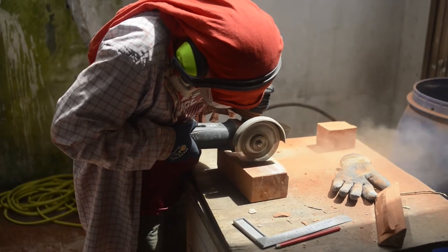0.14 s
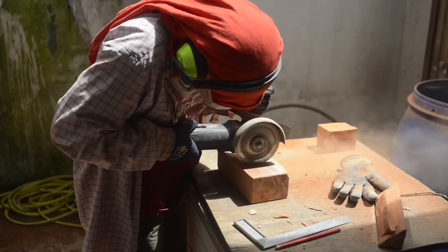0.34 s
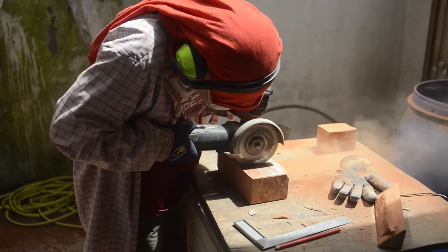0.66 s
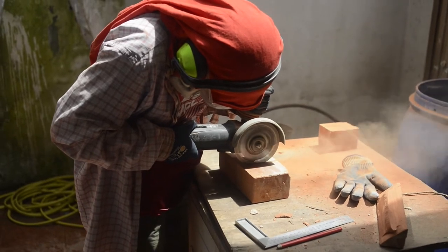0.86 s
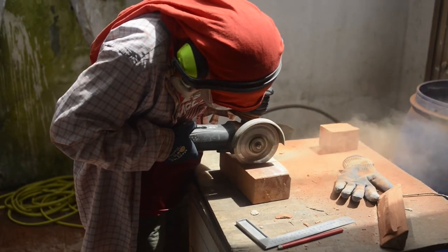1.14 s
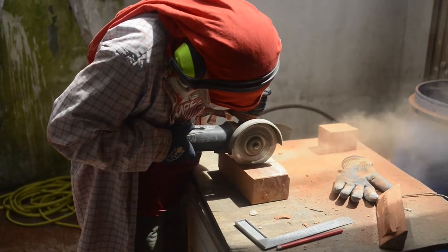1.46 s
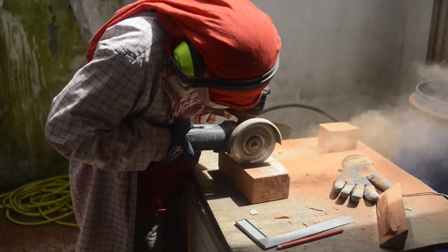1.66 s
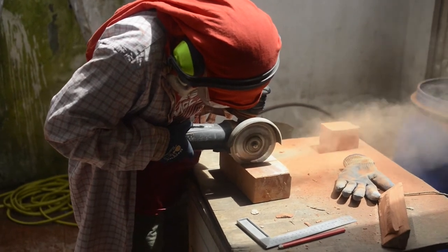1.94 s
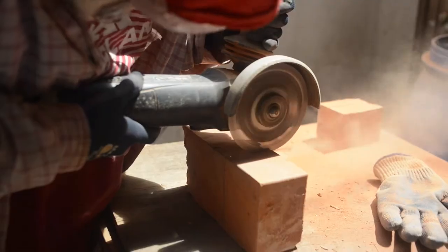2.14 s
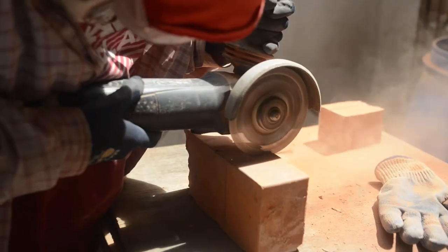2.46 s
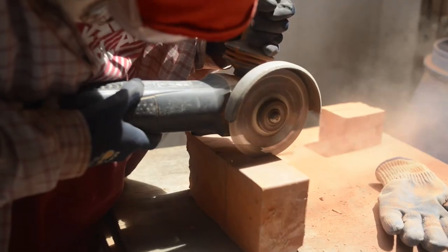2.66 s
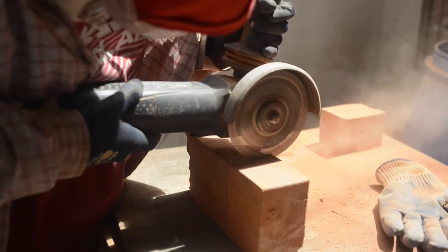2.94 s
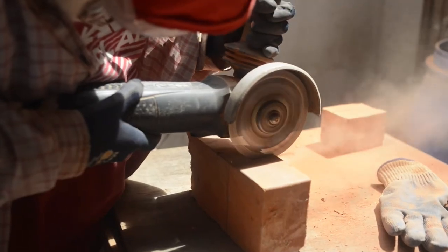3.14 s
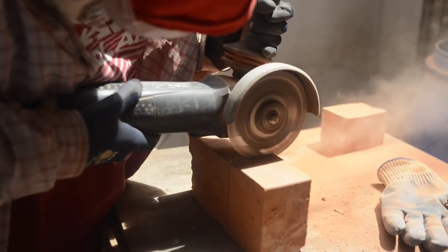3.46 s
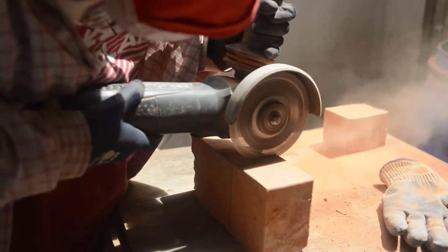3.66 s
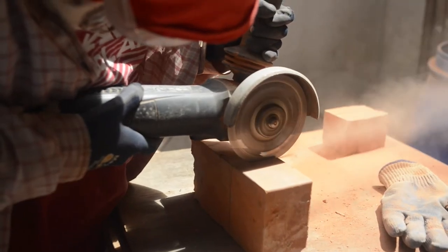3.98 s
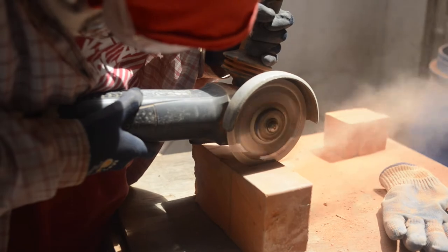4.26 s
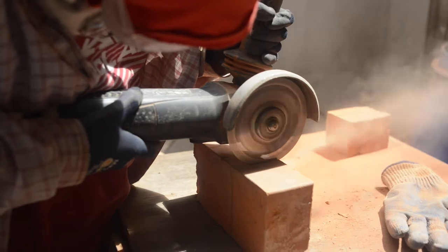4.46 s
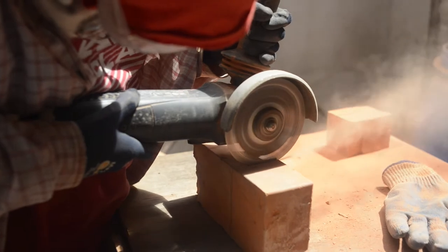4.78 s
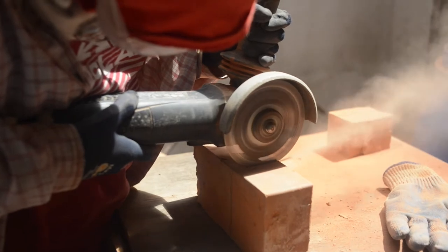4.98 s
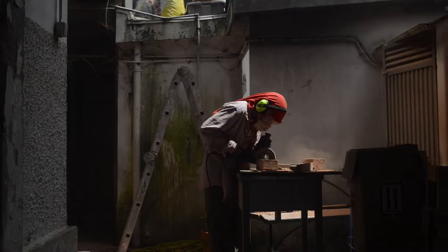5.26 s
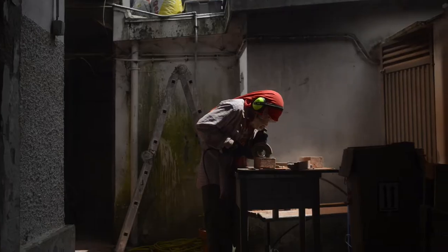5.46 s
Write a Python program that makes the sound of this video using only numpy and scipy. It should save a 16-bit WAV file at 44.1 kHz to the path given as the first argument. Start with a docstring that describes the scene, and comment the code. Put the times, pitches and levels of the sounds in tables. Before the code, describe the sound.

An angle grinder cuts brick with a steady hissing, ringing metallic scrape, changing tone as the listening point moves close, then far away.

```python
"""A hissing, ringing scrape throbs from the start: an angle grinder cuts a brick on a bench in a walled yard.
It is heard from the side, then close to the disc, then from afar; both channels carry the same signal.
Noise driven through narrow resonances rings the steel disc and its guard; shaped noise is brick grit and fan air.
Tones locked to the spindle whine beneath. Short resonant bursts are cracking chips and low knocks;
near the end the gear whine swells four times."""
import sys
import numpy as np
from scipy import signal
from scipy.fft import rfft, irfft
from scipy.io import wavfile
from scipy.ndimage import uniform_filter1d

SR = 44100
rng = np.random.default_rng(int(sys.argv[2]) if len(sys.argv) > 2 else 0)


def dump(signal):
    """Clip the signal to [-1, 1] and save it as 16-bit WAV at the path in sys.argv[1]."""
    limited = np.clip(np.atleast_2d(signal).T, -1, 1)
    pcm = np.round(limited * 32767).astype(np.int16)
    wavfile.write(sys.argv[1], SR, pcm)


N = 247779
TIME = np.arange(N) / SR  # seconds
FREQ = np.maximum(np.arange(N // 2 + 1) * SR / N, 1)  # Hz, kept above zero for logarithms
MAINS_HZ = 50
TOP_HZ = 15700  # upper edge of the passband
SQUEAL_ORDER = 21  # clean gear whine, as a multiple of the spindle speed

# Moves of the listening place, side to close and close to far: time_s
PLACE_CHANGES = [2.105, 5.145]
# Mean spindle speed: time_s, turns_hz
SPINDLE_SPEED = [(0, 145.1), (1.2, 145.05), (2.1, 145.35), (5.3, 145.33), (5.62, 145.05)]
# How hard the disc is fed into the brick: time_s, cut_level_db
FEED = [(0, -34.5), (2.07, -34), (2.15, -36), (2.5, -33), (2.85, -32), (4.4, -34), (4.65, -32), (5.14, -35),
        (5.24, -41), (5.34, -38.5), (5.62, -39)]
# Hardest bites (+) and skips (-) of the rim: centre_s, change_db, length_s
BITES = [(0.603, 2.5, 0.016), (1.583, 2.5, 0.024), (2.116, -9, 0.017), (2.383, 7, 0.011),
         (5.125, 3.5, 0.019)]
# Resonances of disc and guard, width for each of two filter passes, level relative to each other:
# pitch_hz, width_hz, side_db, close_db, far_db
DISC_MODES = [(2907, 277, -21, -36, -28), (3068, 335, -23, -24, -18), (3359, 445, -13, -22, -24),
              (3452, 106, -16, -21, -10), (3736, 275, -19, -13, -20), (3908, 68, -25, -28, -20),
              (4016, 97, -25, -30, -20), (4479, 120, -15, -15, -7), (4580, 212, -20, -14, -17),
              (5303, 219, -16, -12, -10), (5392, 115, -14, -17, -16), (5852, 143, -17, -18, -12),
              (6119, 121, -11, -27, -9), (6225, 294, -9, -8, -16), (7023, 72, -18, -17, -19),
              (7265, 242, -13, -33, -15), (7506, 378, -31, -15, -21), (7986, 94, -14, -10, -13),
              (8197, 169, -13, -10, -13), (9137, 77, -22, -26, -19), (10659, 335, -22, -24, -29),
              (11301, 297, -18, -23, -21), (12010, 249, -22, -23, -19), (12698, 389, -23, -26, -26),
              (13142, 972, -23, -26, -19), (14027, 203, -29, -30, -26), (14513, 584, -28, -32, -39),
              (15447, 213, -29, -30, -28)]
# Two modes that sing out, level before rubbing:
# pitch_hz, width_hz, side_db, close_db, far_db, grip (dB gained per dB of rubbing)
SINGING_MODES = [(6762, 76, -12.5, -9, -8.5, 1.5), (9443, 82, -6.5, -11, -12, 0.36)]
# How hard the disc rubs the sides of the slot: time_s, change_db
SLOT_RUB = [(0, 2), (1.4, -1), (2.2, 2), (3.2, -2), (3.35, 1.5), (3.9, 3.5), (4.5, 0), (5.0, 3.5),
            (5.3, -1.5)]
# Spectrum of crumbling brick and fan air, relative to the scrape and fan levels:
# pitch_hz, side_db_per_hz, close_db_per_hz, far_db_per_hz
HISS_SPECTRA = [(30, -77, -69, -81), (99, -64.5, -65.5, -68), (220, -62, -60.5, -68),
                (400, -60, -60, -62.5), (1045, -53, -55, -49.5), (1990, -50.5, -47, -47.5),
                (2680, -50, -48, -42.5), (3450, -40, -62, -37.5), (4670, -48.5, -49, -44),
                (7160, -41, -46, -41.5), (8800, -44.5, -50.5, -44.5), (11000, -42, -50.5, -45),
                (12650, -57, -64, -52), (15800, -63, -63, -61)]
# Motor and gear tones, levels relative to each other: spindle_multiple, side_db, close_db, far_db
DRIVE_TONES = [(1.3, -92, -83, -102), (1.7, -77, -82, -101), (4, -74, -74, -73), (5, -71, -74, -87),
               (6, -77, -77, -86), (7, -69, -86, -83), (10.35, -68, -71, -66), (13, -65, -76, -76),
               (14.9, -65, -74, -71), (18, -71, -60, -60), (19, -67, -66, -60), (20, -55, -66, -60),
               (21, -55, -67, -70), (23, -56, -69, -57), (24, -65, -56, -70), (26, -63, -54, -70),
               (31, -68, -55, -70)]
# Chips cracking off the brick, peaks relative to each other: start_s, level_db
CHIPS = [(0.184, -26), (0.8794, -25), (1.0794, -26), (1.3424, -27), (1.496, -26), (1.6377, -25),
         (1.8083, -27), (2.6753, -25), (2.9856, -26), (3.0714, -25)]
# The rim catches and the brick knocks on the bench, peaks relative to each other: start_s, level_db
KNOCKS = [(1.331, -53), (1.575, -52), (2.389, -59), (2.669, -63), (3.06, -64), (3.829, -54), (4.059, -50),
          (4.12, -54), (4.609, -51)]
# Higher gear tones above the clean whine: spindle_multiple, share_db
HIGHER_ORDERS = [(24, -1.5), (26, -5.5), (31, -1)]
# Swells of the gear whine, heard from afar: centre_s, length_s, clean_tone_db, higher_tones_db
SQUEALS = [(5.172, 0.11, -37.5, -52), (5.309, 0.072, -34.5, -50), (5.385, 0.062, -41, -46),
           (5.52, 0.11, -45, -39.5)]


def undb(db):
    """Level and amplitude: 20 dB is a tenfold gain."""
    return 10 ** (np.asarray(db) / 20)


def unit(x):
    """Normalisation: scale a signal to rms 1."""
    return x / np.sqrt(np.mean(x ** 2))


def curve(rows):
    """Linear interpolation: join each table column by straight lines in time."""
    knots_s, *columns = np.transpose(rows)
    return [np.interp(TIME, knots_s, column) for column in columns]


def walk(rate_hz):
    """Slow random modulation: `rate_hz` random values a second, joined by lines, with rms 1."""
    knots = rng.standard_normal(4096)
    return unit(np.interp(TIME * rate_hz, np.arange(len(knots)), knots))


def swell(centre_s, length_s):
    """Gaussian envelope: above half height for `length_s` around its centre."""
    return np.exp(-np.log(2) * (2 * (TIME - centre_s) / length_s) ** 2)


def resonate(x, hz, width_hz):
    """Damped resonance: a second-order peak with gain 1 at its centre."""
    b, a = signal.iirpeak(hz, hz / width_hz, fs=SR)
    return signal.lfilter(b, a, x)


def colour(x, hz, db_per_hz):
    """Spectral shaping: weight white sound of rms 1 by a density interpolated over log frequency."""
    gain = undb(np.interp(np.log(FREQ), np.log(hz), db_per_hz))
    bass_cut = np.minimum(FREQ / hz[0], 1) ** 2
    return irfft(rfft(x) * gain * bass_cut * np.sqrt(SR / 2), N)


def places():
    """Listening position: one row for each place, 1 while it is heard, with short crossfades."""
    place = np.searchsorted(PLACE_CHANGES, TIME)
    is_here = place == np.arange(len(PLACE_CHANGES) + 1)[:, None]
    return uniform_filter1d(1. * is_here, size=64, axis=1)


def throb(turns, wobble, ripple, beat, shake_db):
    """Amplitude modulation: a warped disc touches twice a turn; torque ripples at twice mains and beats."""
    mains = 2 * MAINS_HZ * TIME  # cycles of torque ripple
    regular = wobble * np.cos(4 * np.pi * turns)
    regular += ripple * np.cos(2 * np.pi * mains)
    regular += beat * np.cos(2 * np.pi * (turns - mains))
    return unit((1 + regular) * undb(shake_db * walk(70)))


def bites(per_second=36, spread_db=0.6):
    """Irregular contact: the rim bites and skips all the time, a few times hard; in dB."""
    hard_db = sum(db * swell(centre_s, length_s) for centre_s, db, length_s in BITES)
    return spread_db * walk(per_second) + hard_db


def ring(contact, hz, width_hz, sway_db, saturation):
    """Friction-driven mode: two resonances in series give steep flanks; the level sways with the contact point."""
    rubbed = rng.standard_normal(N) * contact * undb(sway_db * walk(30))
    swing = resonate(resonate(rubbed, hz, width_hz), hz, width_hz)
    # the friction that feeds a mode also limits it, which evens out its swings
    envelope = np.abs(signal.hilbert(swing))
    return unit(swing / envelope ** saturation)


def disc(feed_db, contact, heard, ring_db=0.07):
    """Modal vibration: the scraping rim drives all modes; two sing out as the disc rubs the slot."""
    body, song = 0, 0
    rub_db = curve(SLOT_RUB)[0]
    for hz, width_hz, *share_db in DISC_MODES:
        mode = ring(contact, hz, width_hz, sway_db=0.63, saturation=0.047)
        body = body + mode * (undb(share_db) @ heard)
    for hz, width_hz, *share_db, grip in SINGING_MODES:
        mode = ring(contact, hz, width_hz, sway_db=0.2, saturation=0.11)
        song = song + mode * (undb(share_db) @ heard) * undb(grip * rub_db)
    return (body * undb(ring_db) + song) * undb(feed_db)


def grit(per_second=9000, spread_db=1.5, air=0.81):
    """Impulse noise: dense fractures of unequal size and random sign in a rush of air."""
    hit = rng.random(N) < per_second / SR
    sizes = undb(spread_db * np.minimum(rng.exponential(size=N), 6))
    fractures = unit(hit * sizes * rng.choice([-1, 1], N))
    return unit(fractures + air * rng.standard_normal(N))


def crumbling(feed_db, contact, heard, fan_hz=1500, fan_db=-33.5, fan_drift_db=1.0):
    """Broadband noise: treble grit follows the feed; the bass is mostly the steadier rush of the fan."""
    hz, *spectra = np.transpose(HISS_SPECTRA)
    fan_share = 1 / (1 + (FREQ / fan_hz) ** 4)  # share of power
    scrape = grit() * contact * undb(feed_db)
    # the fan level moves half as many dB as the feed
    fan_level_db = fan_drift_db * walk(15) + (fan_db + feed_db) / 2
    fan = rng.standard_normal(N) * contact * undb(fan_level_db)
    rush = irfft(rfft(scrape) * np.sqrt(1 - fan_share) + rfft(fan) * np.sqrt(fan_share), N)
    return sum(on * colour(rush, hz, db) for on, db in zip(heard, spectra))


def tone(cycles, jitter, flutter_db):
    """Phase and amplitude modulation: play between the teeth makes a machine tone flutter (jitter in rad)."""
    phase = 2 * np.pi * (cycles + rng.random()) + jitter * walk(40)
    return unit(np.sin(phase) * undb(flutter_db * walk(25)))


def drive(turns, heard, tones_db):
    """Rotational orders: motor and gear tones keep fixed ratios to the spindle speed."""
    hum = 0
    for multiple, *level_db in DRIVE_TONES:
        hum = hum + tone(multiple * turns, jitter=0.36, flutter_db=2.0) * (undb(level_db) @ heard)
    return undb(tones_db) * hum


def yard(x, heard, wall_db=-11, decay_s=0.034):
    """Early reflection: bench and walls return echoes, different at each place, which ripple the spectrum."""
    age = np.arange(SR // 6) / SR
    reflected = 0
    for on in heard:
        echoes = rng.standard_normal(len(age)) * np.exp(-age / decay_s) * (age > .003)
        echoes /= np.linalg.norm(echoes)
        reflected = reflected + on * signal.fftconvolve(x, echoes)[:N]
    return (x + undb(wall_db) * reflected) / np.hypot(1, undb(wall_db))


def cracks(events, decay_s, ring_hz, width_hz, gain_db):
    """Impact response: each event is a decaying noise burst through one broad resonance."""
    out = np.zeros(N)
    age = np.arange(SR // 12) / SR
    for start_s, level_db in events:
        burst = rng.standard_normal(len(age)) * np.exp(-age / decay_s)
        crack = resonate(burst, ring_hz, width_hz)
        start = int(start_s * SR)
        out[start:start + len(age)] += crack * undb(level_db + gain_db) / np.abs(crack).max()
    return out


def chips():
    """Brittle fracture: chips crack off the brick as very short bursts."""
    return cracks(CHIPS, decay_s=.0008, ring_hz=3500, width_hz=2000, gain_db=-1)


def knocks():
    """Low-frequency impact: the rim catches and the brick knocks on the bench."""
    return cracks(KNOCKS, decay_s=.012, ring_hz=200, width_hz=220, gain_db=-1.5)


def squeal(turns):
    """Gear-mesh orders: as the tool tilts, one clean tone and a higher group above it swell."""
    clean_gain = sum(undb(db) * swell(s, length_s) for s, length_s, db, _ in SQUEALS)
    high_gain = sum(undb(db) * swell(s, length_s) for s, length_s, _, db in SQUEALS)
    clean = tone(SQUEAL_ORDER * turns, jitter=.2, flutter_db=2.0)
    high = sum(undb(db) * tone(multiple * turns, jitter=0.25, flutter_db=1.0) for multiple, db in HIGHER_ORDERS)
    return clean_gain * clean + high_gain * high


def scene():
    """Superposition: one spindle drives the tones, one feed and contact the cut; echoes join all but the gears."""
    speed_hz = curve(SPINDLE_SPEED)[0] * (1 + 0.00046 * walk(12))
    turns = np.cumsum(speed_hz) / SR
    feed_db, heard = curve(FEED)[0], places()
    contact = throb(turns, wobble=0.067, ripple=0.14, beat=.14, shake_db=0.68) * undb(bites())
    cut = disc(feed_db, contact, heard) + crumbling(feed_db, contact, heard)
    gears = drive(turns, heard, tones_db=-0.2) + squeal(turns) * heard[-1]
    sound = yard(cut + chips() + knocks(), heard) + gears
    return np.array([sound, sound])


def record(dry):
    """Band limiting: a steep elliptic low-pass removes the top of the spectrum."""
    low_pass = signal.ellip(16, .1, 70, TOP_HZ, fs=SR, output="sos")
    return signal.sosfilt(low_pass, dry)


dry = scene()
out = record(dry)
dump(out)
```